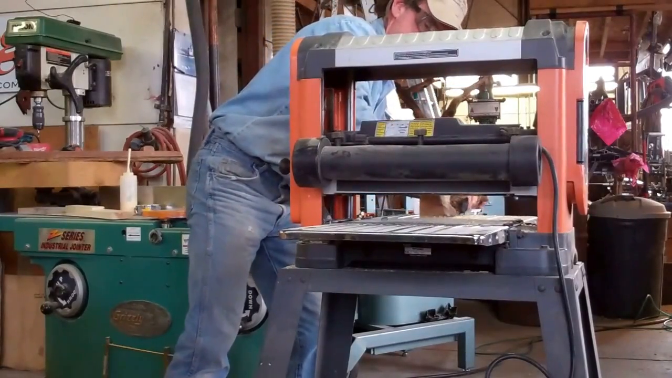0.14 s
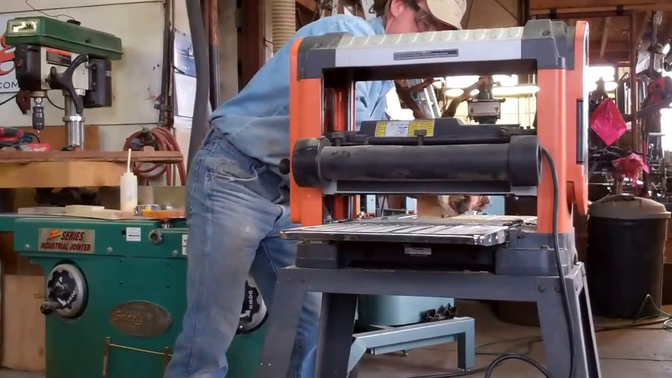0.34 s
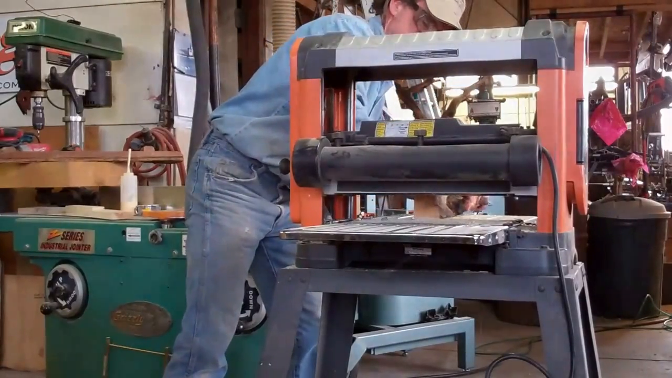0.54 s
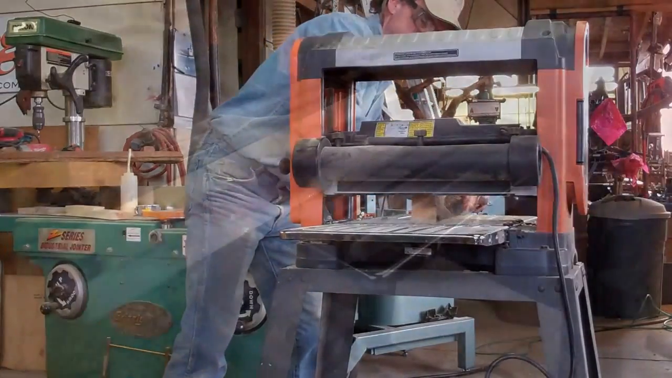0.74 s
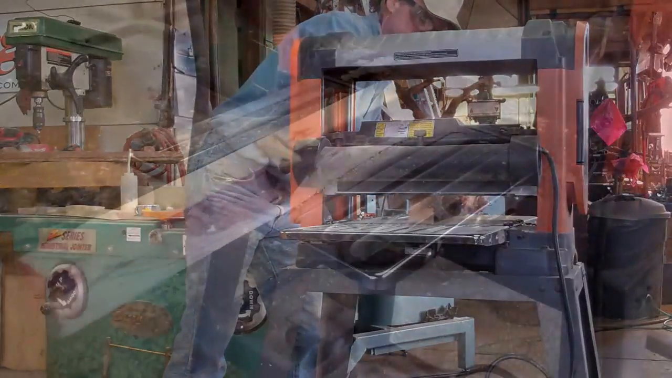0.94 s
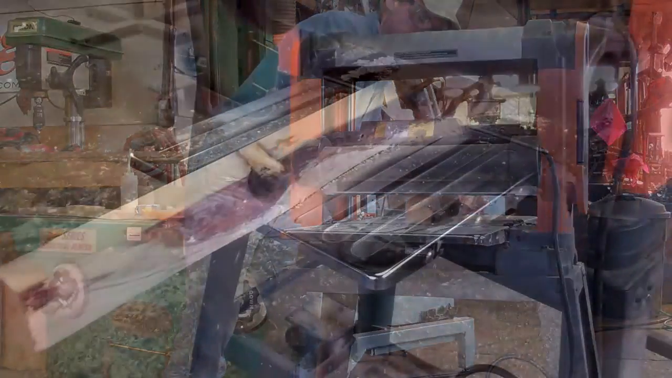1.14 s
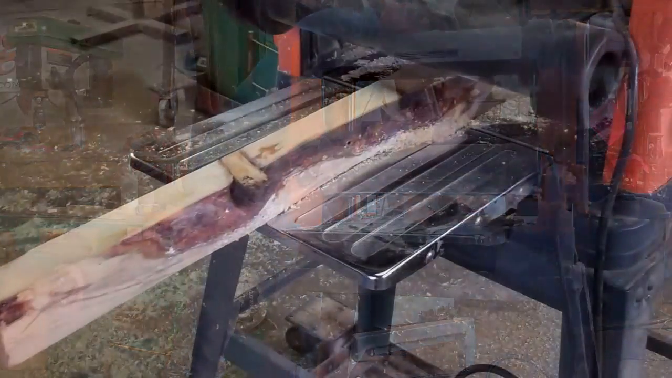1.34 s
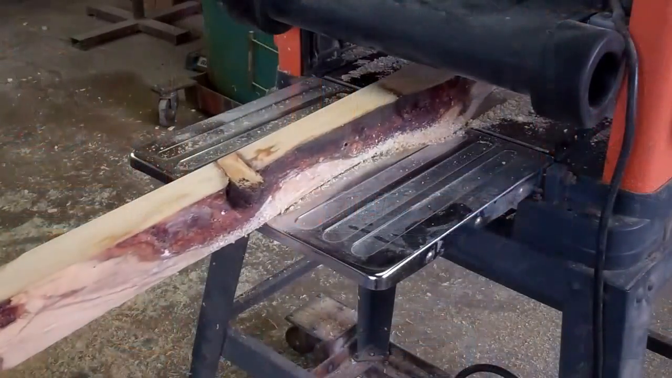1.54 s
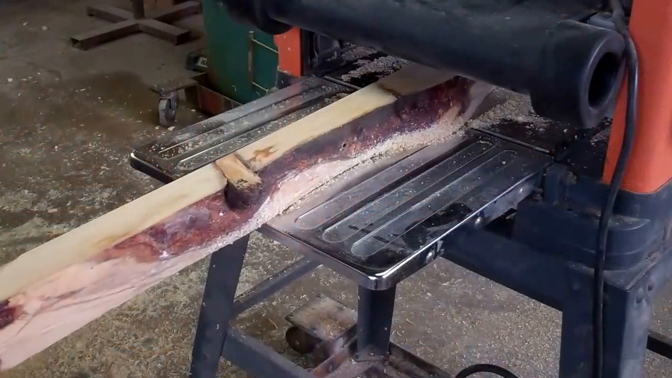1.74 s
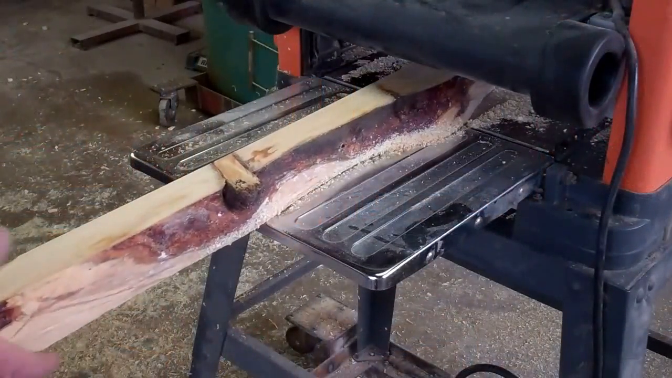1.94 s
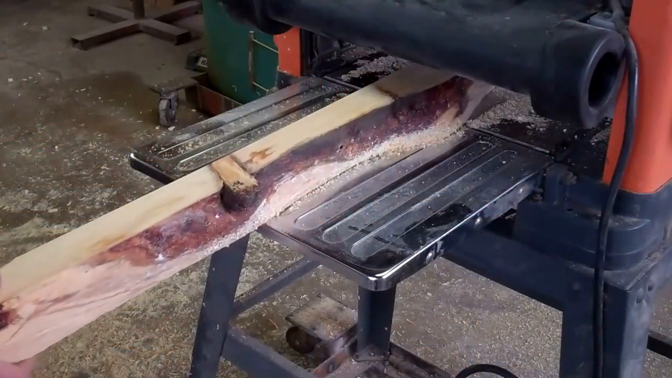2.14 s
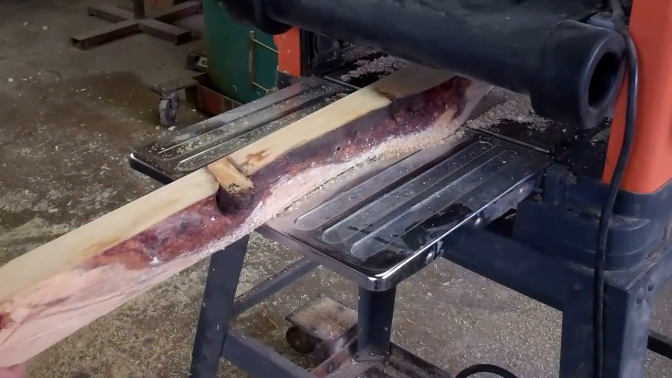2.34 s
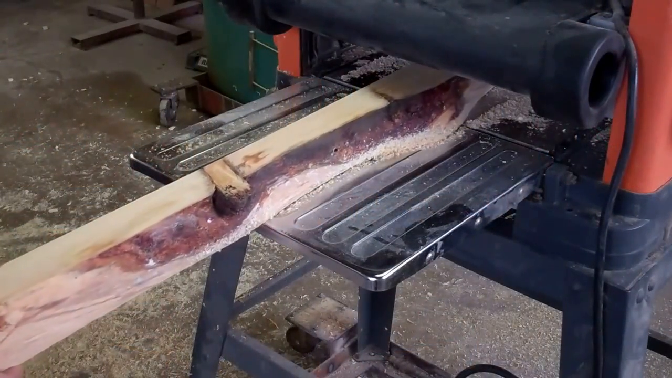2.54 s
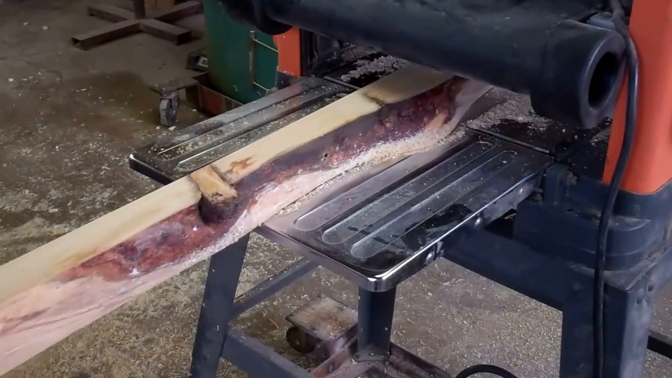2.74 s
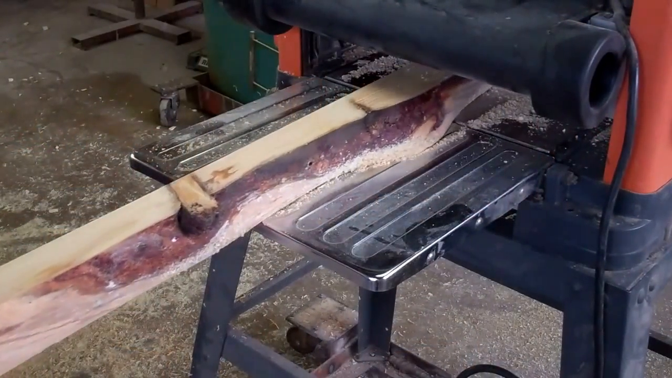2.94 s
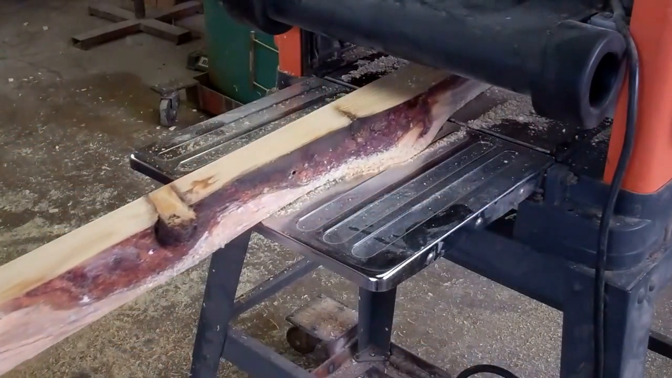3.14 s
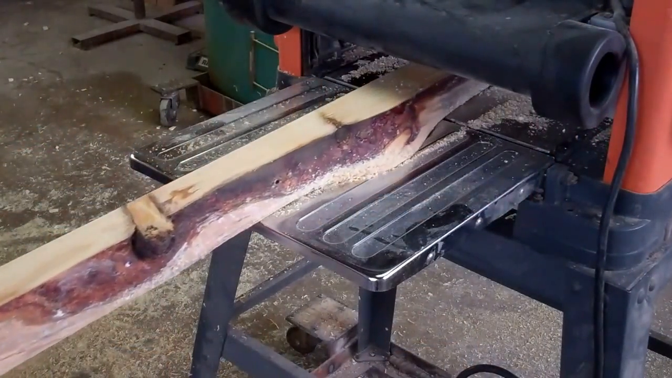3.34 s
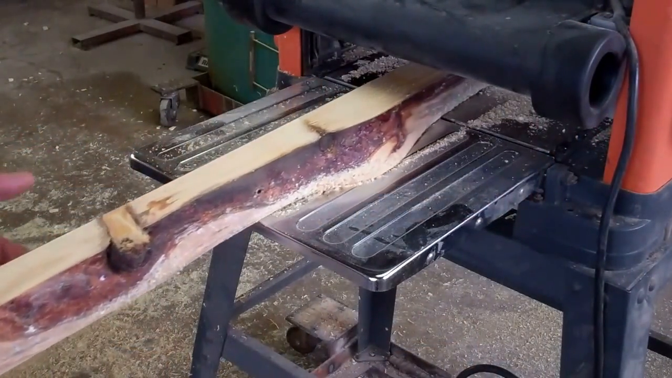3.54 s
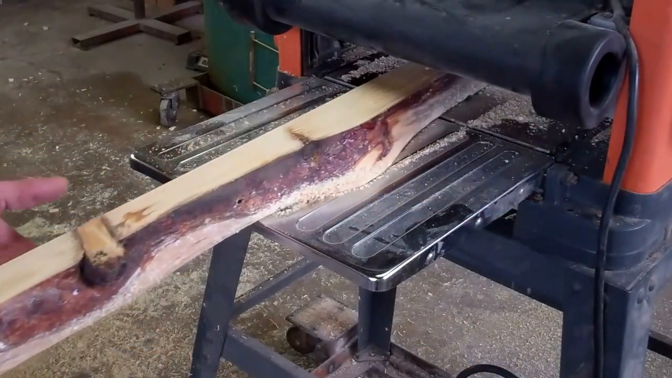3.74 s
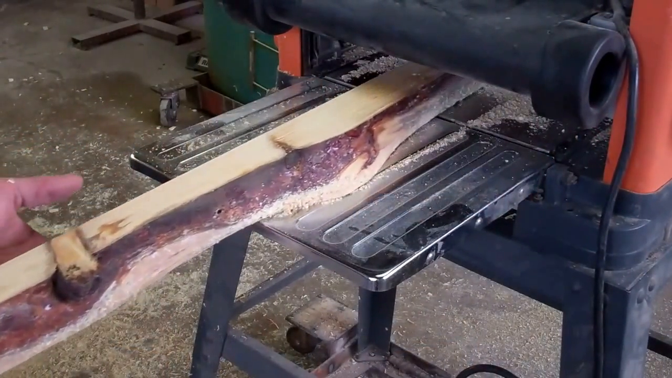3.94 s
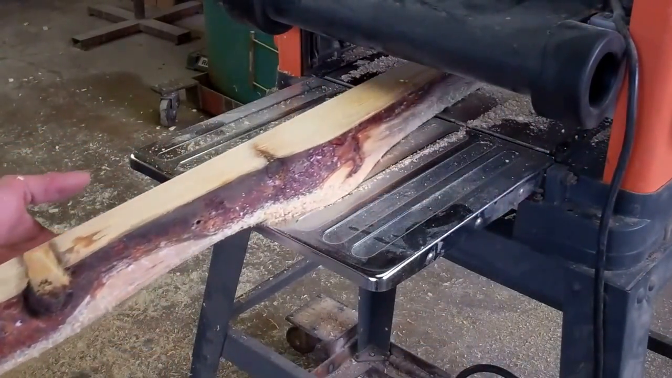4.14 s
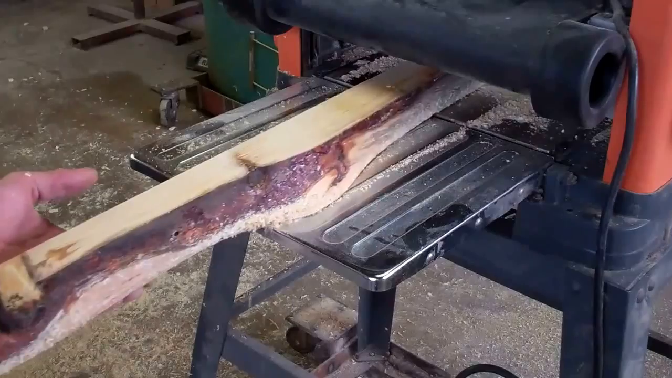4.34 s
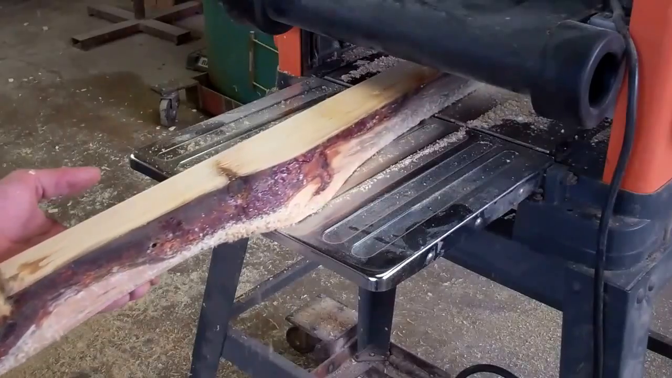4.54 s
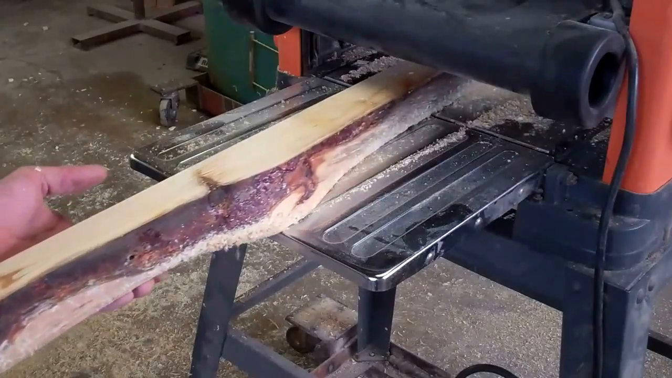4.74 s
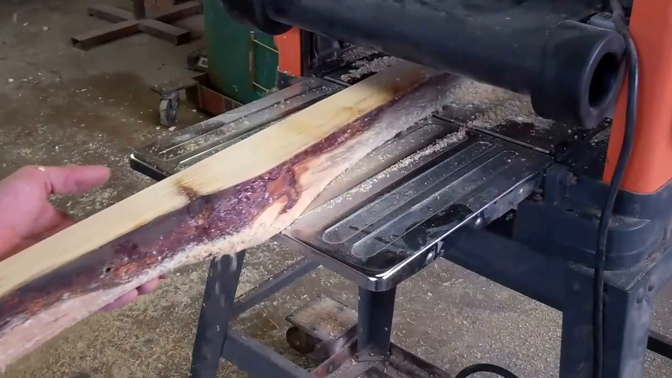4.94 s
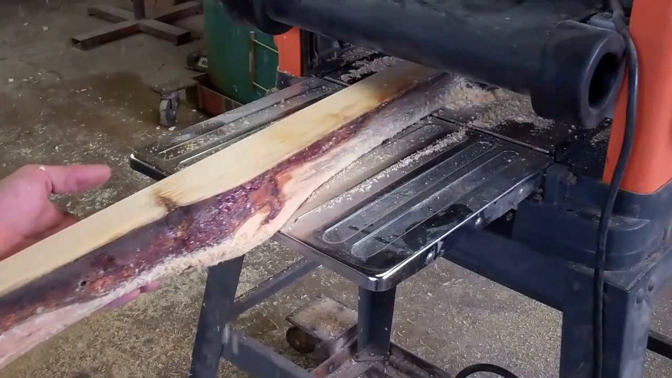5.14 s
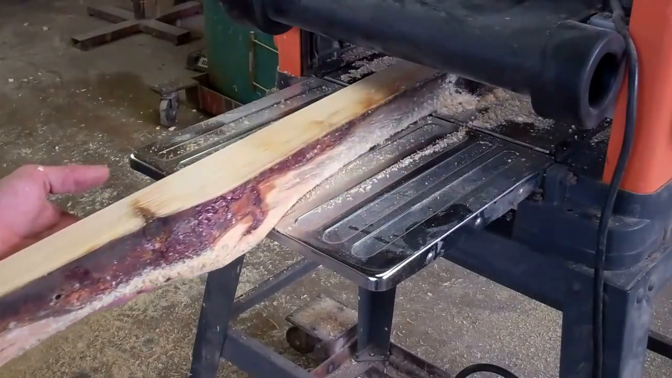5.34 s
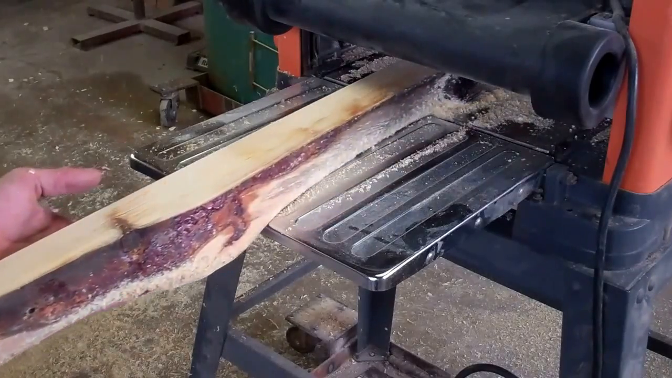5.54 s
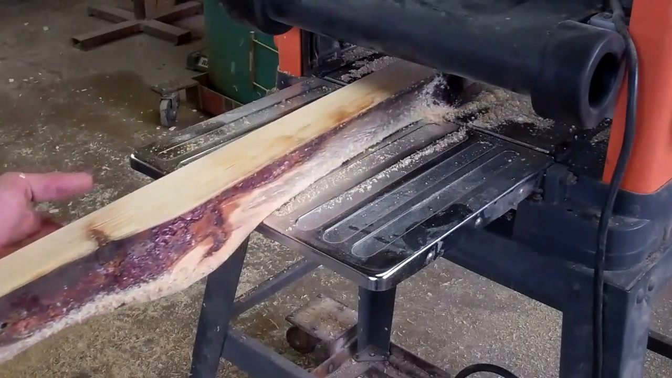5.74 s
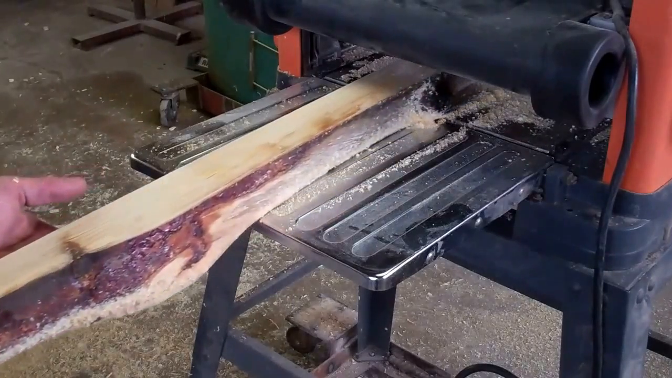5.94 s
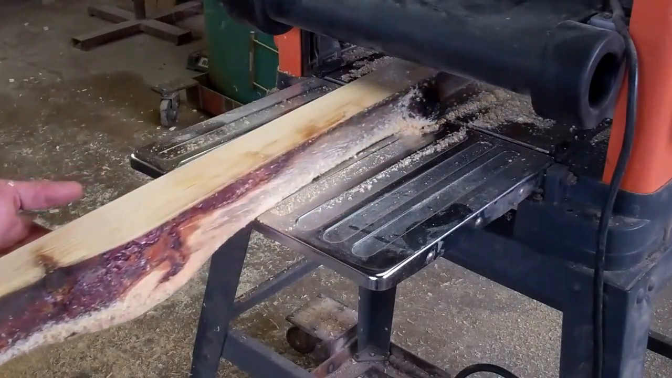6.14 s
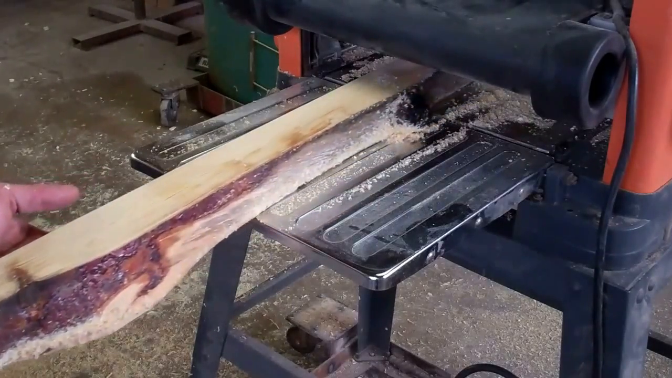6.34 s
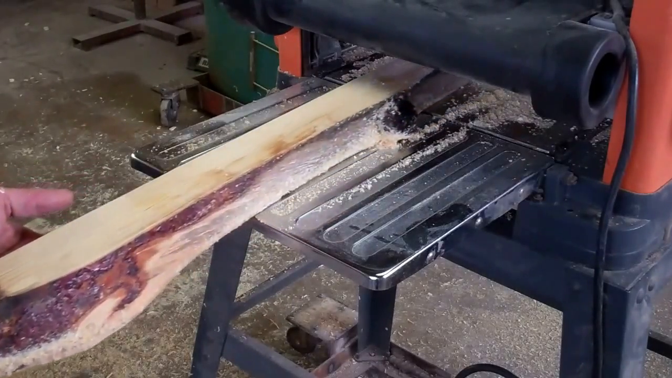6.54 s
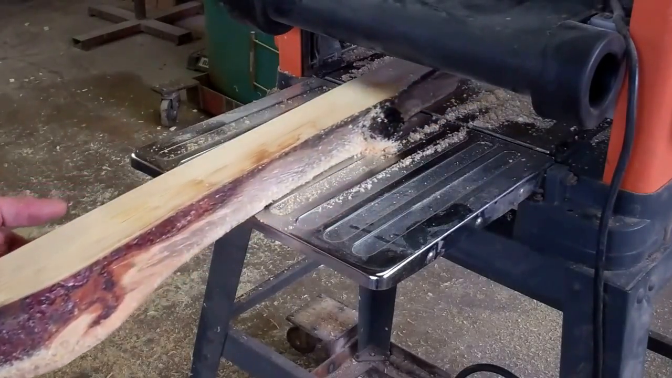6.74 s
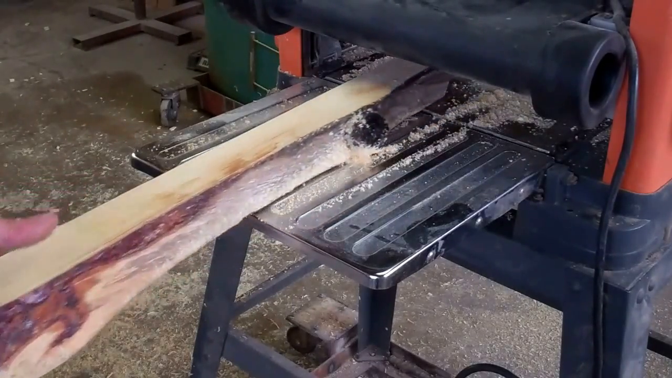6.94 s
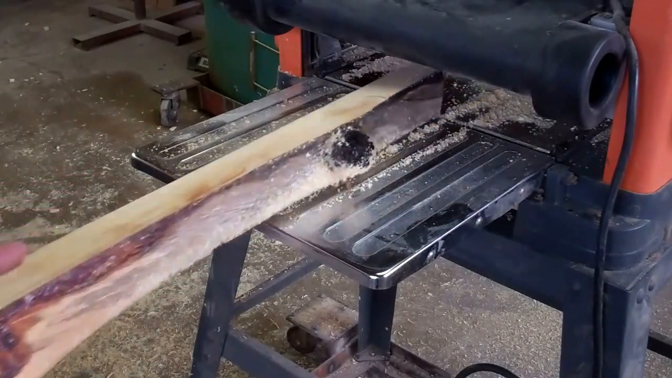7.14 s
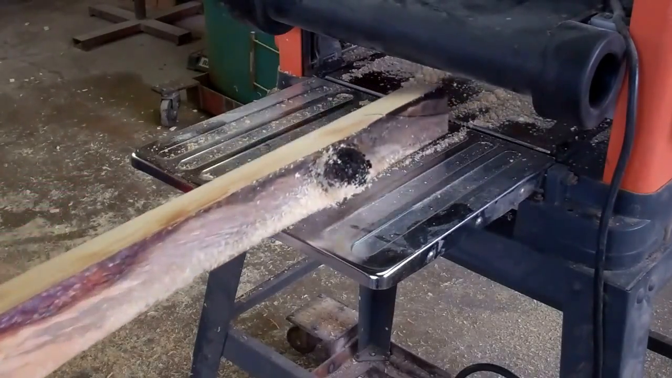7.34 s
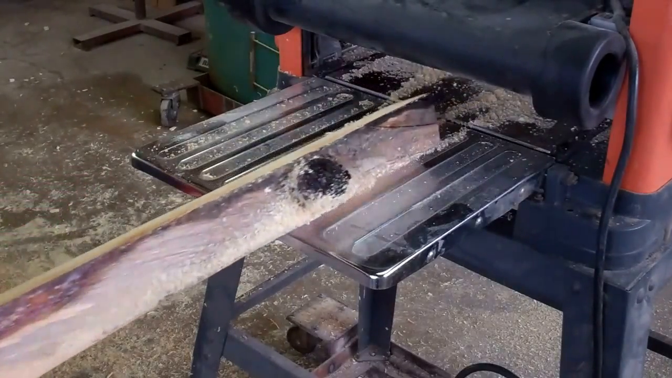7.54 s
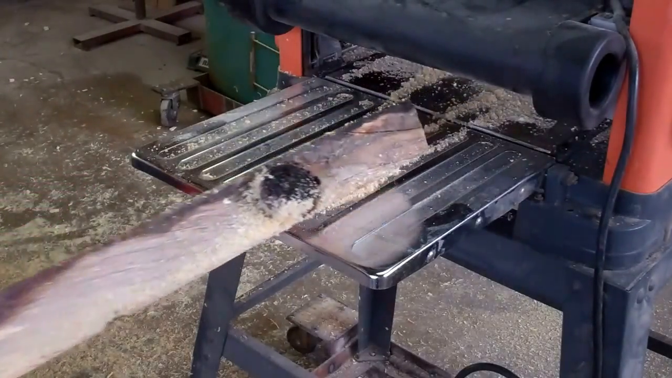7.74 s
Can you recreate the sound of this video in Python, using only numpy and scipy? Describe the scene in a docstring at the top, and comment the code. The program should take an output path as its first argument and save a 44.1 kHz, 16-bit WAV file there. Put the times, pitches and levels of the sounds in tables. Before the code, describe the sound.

Close stereo pickup of a thickness planer, weighted left, with a short room tail. Brief free whine, then knives drag into wood: a loud buzzing howl of changing overtones under a steady spray of chips. It growls and labours before five seconds, splinters crackle at a knot, a last harsh burst ends the cut, and only the rising whine and airy rush remain.

```python
"""A benchtop thickness planer in a small workshop, on a stereo pair, louder on the left.
First it runs free, heard from behind: a whining motor, a fan's rush and the siren of the two-knife cutter head.
A rough slab enters and the knives drag; the view dissolves to the infeed table, near 290 strokes a second.
The slab's resonances lift changing harmonics of the strokes and faint whistles come and go among them.
A knot tears and crackles as random splinters; then the slab leaves and the machine spins up free."""
import sys
import numpy as np
from scipy import signal
from scipy.fft import rfft, irfft
from scipy.io import wavfile
from scipy.ndimage import map_coordinates

SR = 44100
rng = np.random.default_rng(int(sys.argv[2]) if len(sys.argv) > 2 else 0)


def store_pcm(level_fs):
    """Save levels as 16-bit WAV."""
    pcm = np.round(np.clip(level_fs, -1, 1) * 32767).astype(np.int16)
    wavfile.write(sys.argv[1], SR, np.atleast_2d(pcm).T)


N = 343980
STEP = 100  # samples per step of the slow time grid
TIME = np.arange(N) / SR
SLOW_TIME = TIME[::STEP]
SIDES = np.array([[1], [-1]])  # left, right

# All levels in the tables are relative: the viewpoint, the room and the stereo balance scale them further.
# air through the housing: (frequency [Hz], density [dB per Hz])
AIR_SPECTRUM = [(30, -39), (115, -36), (200, -9), (290, -5), (430, -0.5), (530, -5.5), (650, 4), (950, 4),
                (1300, -0.5), (2300, 0.5), (4200, -1), (5600, -4), (7500, -7.5), (14000, -11.5)]
# tones of the motor and its fan: (multiple of the motor speed [ratio], level [dB])
MOTOR_TONES = [(2, -40.5), (4, -52), (6, -32.5), (12, -27.5), (24, -58)]
# tones of the cutter head and its drive: (multiple of the knife rate [ratio], level [dB])
HEAD_TONES = [(1, -30), (1.32, -47), (2, -32), (3, -33)]
# standing waves at the infeed table lift and sink the low tones as the speed slides through them:
# (frequency [Hz], level [dB])
STANDING_WAVES = [(140, -5), (147, 0), (270, 6), (281, 5), (285, 6.5), (289, 5), (292.5, -3), (297, 0.5),
                  (305, 2.5), (314, -4.5), (322, 0.5), (400, 1)]
# what each viewpoint hears: (knives [dB], air rush [dB], motor whine [dB], cutter head siren [dB],
# shaking of the stand [dB])
BEHIND_LEVELS = (-1.5, -22, -8.5, -0.9, -56.5)
INFEED_LEVELS = (-1, -18.5, 1, 1, -46)
# knife strokes a second, from behind and at the infeed table, before the spin-up: (time [s], rate [Hz])
SPEED_BEHIND = [(0, 311.3), (.48, 320), (.85, 311.2), (1.4, 308)]
SPEED_INFEED = [(0.95, 287.9), (1.15, 288.2), (1.39, 287.7), (1.49, 290.6), (2.19, 298.6), (3.18, 292.9),
                (3.98, 294.4), (4.49, 294.1), (4.59, 292.9), (4.85, 285.1), (5.29, 280.4), (5.53, 283.2),
                (5.85, 285.2), (6.35, 290.4), (6.4, 291.8)]
# spray of chips against the hood: (frequency [Hz], density [dB per Hz])
CHIP_SPECTRUM = [(60, -27), (300, -27), (1000, -15), (2000, 5.5), (4000, -5), (6500, 2.5), (10000, 1.5),
                 (14000, -1)]
# showers of chips from the first touch, a rough patch, the knot and the end of the slab:
# (time of the top [s], half length [s], level [dB])
CHIP_SHOWERS = [(0.553, 0.067, -23), (2.95, 0.35, -23), (5.2, 0.11, -19.5), (5.486, 0.13, -11.5),
                (6, 0.11, -19), (6.385, .025, -20)]
# fibres that tear out in rough grain and at the knot:
# (time of the top [s], half length [s], frequency [Hz], width [Hz], level [dB])
TEARS = [(.521, 0.0095, 6700, 900, -22), (0.634, 0.14, 6660, 1000, -31), (4.723, 0.089, 1700, 1209, -26),
         (5.412, 0.05, 8200, 1500, -17.5), (5.455, .004, 2402, 2004, -30), (5.55, 0.13, 3730, 1690, -17.5),
         (5.588, 0.045, 2481, 1480, -19), (6.383, 0.025, 2350, 2603, -21)]
# the slab lifts off the table and bounces once a turn of the cutter head:
# (time of the top [s], half length [s], level [dB])
CHATTER_SWELLS = [(1.647, 0.18, -35), (4.716, 0.19, -29)]
# tones of that bounce: (multiple of the knife rate [ratio], level [dB])
CHATTER_TONES = [(1.5, -2), (2.5, 0), (3.5, -5)]
# how hard the knives bite: (time [s], level [dB])
BITE = [(.5, -35), (1, -30), (1.5, -32.5), (2.5, -32), (3.5, -29), (4.7, -25.5), (4.95, -28.5), (5.4, -29),
        (5.6, -25.5), (6.15, -28.5), (6.4, -22.5)]
# spectrum of a knife stroke: (frequency [Hz], level [dB])
STROKE_SPECTRUM = [(290, -27), (600, -15.5), (1200, 2), (2400, 2), (4000, 0.7), (6000, -5), (9000, -10.5),
                   (13000, -11.5)]
# resonances that swell and fade as the slab moves under the rollers:
# (time of the top [s], half length [s], frequency [Hz], width [Hz], level [dB])
SLAB_RINGS = [(.66, 0.12, 1695, 221, -22.5), (1.02, 0.16, 2060, 200, -22), (1.1, 0.21, 860, 100, -28),
              (1.65, 0.22, 1290, 297, -20), (2.2, 0.41, 563.6, 99, -20), (2.5, .55, 1756, 129, -23),
              (2.52, .2, 2630, 150, -26), (2.73, 0.091, 6680, 340, -23), (3.22, 0.44, 7620, 170, -29),
              (3.25, .14, 9320, 295, -26), (3.41, 0.6, 1500, 130, -23.5), (3.56, 0.16, 5520, 190, -22),
              (3.62, 0.31, 2005, 340, -16.5), (4.43, 0.36, 1140, 180, -21), (4.48, 0.28, 3040, 940, -17.5),
              (4.54, .13, 5340, 240, -22.5), (4.62, 0.09, 1030, 390, -12), (4.75, 0.13, 580, 160, -20),
              (4.835, 0.067, 1563, 370, -8), (4.95, .09, 2400, 360, -16), (4.97, 0.064, 1450, 750, -19),
              (5.6, 0.083, 2160, 420, -13.5), (5.81, 0.14, 1575, 323, -16.5), (5.83, 0.11, 2710, 390, -20),
              (6.09, 0.11, 712, 240, -14.5), (6.18, 0.21, 4230, 900, -21), (6.305, 0.087, 1276, 250, -16),
              (6.31, 0.09, 5270, 1300, -24), (6.32, 0.096, 2440, 480, -12.5)]

DISSOLVE_S = (.65, 1.4)  # from behind to the infeed table
SLAB_ENTERS_S, SLAB_LEAVES_S, SLAB_EDGE_S = .51, 6.415, 0.017
FREE_HZ, SPIN_UP_S = 331.2, .84  # with the slab gone, the knife rate closes in on its free value
LABOURS_BELOW_HZ, SAG_DB_PER_HZ = 290.8, 0.24  # fan and siren weaken below this knife rate
MOTOR_TURNS_PER_STROKE = 1.0583
HUM_HZ = 120  # twice the mains frequency
SPRAY_OVER_BITE_DB = 4  # the steady spray of chips follows the bite
RING_SQUARENESS = 2.84  # 2 is a bell; more holds the top longer and lets go faster
# fainter whistles come and go by chance all through the cut
WHISTLE_RANGE_HZ, WHISTLE_HALF_S, WHISTLE_WIDTH_HZ, WHISTLE_OVER_BITE_DB = (2370, 7500), 0.046, 410, 4.5
LEFT_MINUS_RIGHT_DB = 5
TOP_HZ = 14150  # upper edge of the recorder's band


def undb(db):
    """Decibels to gain."""
    return 10 ** (np.asarray(db) / 20)


def curve(table, t, axis=1):
    """One column of a table of time points, joined by straight lines."""
    rows = np.array(table)
    return np.interp(t, rows[:, 0], rows[:, axis])


def gain_at(spectrum, hz):
    """Gain of a (Hz, dB) spectrum at any frequency."""
    rows = np.array(spectrum)
    return undb(np.interp(np.log(hz + 1), np.log(rows[:, 0]), rows[:, 1]))


def walk(rate):
    """Slow chance with a spread near 1, on the slow time grid; rate in knots a second."""
    knots = rng.standard_normal(4096)
    return map_coordinates(knots, [SLOW_TIME * rate], order=3, mode="wrap")


def fast(slow):
    """From the slow time grid to every sample."""
    return np.interp(TIME, SLOW_TIME, slow)


def swell(t, top_s, half_s, squareness=2):
    """Bell-shaped rise and fall."""
    return np.exp(-.5 * np.abs((t - top_s) / half_s) ** squareness)


def resonance(hz, centre_hz, width_hz):
    """Complex response of a pair of like resonances."""
    return 1 / (1 + 2j * (hz - centre_hz) / width_hz) ** 2


def spread(hz, apart_hz=10000, least=0.044):
    """Side-to-mid ratio between the microphones: little in the bass, large in the treble."""
    return np.minimum(least + hz / apart_hz, 1.15)


def colour(pair, response):
    """Filter two unrelated signals and use them as mid and side."""
    hz = np.arange(N // 2 + 1) * SR / N
    widths = np.array([np.ones(len(hz)), spread(hz)])
    mid, side = irfft(rfft(pair) * response(hz) * widths, N)
    return (mid + SIDES * side) / np.std(mid)


def tones(table, angle, waver, waver_rate):
    """Lines locked to a shaft, wavering in the moving air."""
    out = 0
    for multiple, db in table:
        size = fast(1 + waver * (walk(waver_rate) + 1j * walk(waver_rate)))
        out = out + undb(db) * np.sqrt(2) * (size * np.exp(1j * multiple * angle)).real
    return out


def workshop(x, t60_s=0.37, wet_db=-17):
    """Short diffuse tail of a cluttered room: decaying noise, thin in the bass."""
    t = TIME[:SR // 2]
    tail = rng.standard_normal((2, len(t))) * undb(-60 * t / t60_s) * (t > .006)
    tail = signal.sosfilt(signal.butter(1, 700, "high", fs=SR, output="sos"), tail)
    tail /= np.sqrt(np.sum(tail ** 2, axis=1, keepdims=True))
    return x + undb(wet_db) * signal.fftconvolve(x, tail, axes=1)[:, :N]


def hum():
    """The motor's iron hums at twice the mains frequency."""
    return undb(-58) * np.sqrt(2) * np.sin(2 * np.pi * HUM_HZ * TIME)


def air(angle, chop=0.11):
    """The fan's rush through the housing, chopped lightly by the passing knives."""
    rush = rng.standard_normal((2, N)) * (1 + chop * np.cos(angle))
    return colour(rush, lambda hz: gain_at(AIR_SPECTRUM, hz))


def knife_rate(speed):
    """Strokes a second: the speed table, then an exponential rise towards the free rate."""
    freed = 1 - np.exp(-np.maximum(SLOW_TIME - speed[-1][0], 0) / SPIN_UP_S)
    loaded = curve(speed, SLOW_TIME)
    return loaded + (FREE_HZ - loaded) * freed


def knife_angle(rate, flutter_hz=0.2208):
    """Phase of the knife strokes; the belt makes the speed flutter a little."""
    return 2 * np.pi * np.cumsum(fast(rate + flutter_hz * walk(25))) / SR


def drive(rate, angle, room, whine_db, siren_db, shake_db):
    """Siren of the cutter head and whine of the motor, locked together by the belt."""
    def lift(multiple):
        """Gain of the standing waves at a multiple of the knife rate."""
        return fast(gain_at(room, multiple * rate)) if room else 1

    head = sum(tones([row], angle, waver=0.1, waver_rate=14) * lift(row[0]) for row in HEAD_TONES)
    motor = tones(MOTOR_TONES, angle * MOTOR_TURNS_PER_STROKE, waver=0.29, waver_rate=45)
    # the unbalanced head shakes the stand once a turn, which is two strokes
    shake = np.sqrt(2) * np.cos(angle / 2) * lift(0.497)
    return head * undb(siren_db) + motor * undb(whine_db) + shake * undb(shake_db)


def in_wood():
    """1 while the slab is under the cutter head, 0 before and after, with short ramps."""
    inside_s = np.minimum(TIME - SLAB_ENTERS_S, SLAB_LEAVES_S - TIME)
    return np.clip(inside_s / SLAB_EDGE_S + .5, 0, 1)


def splinters(angle, grain_db, gate, stroke_db):
    """Dense tiny cracks of uneven size, in a burst at every knife stroke."""
    stroke = np.clip(angle / (2 * np.pi), 0, 4095).astype(int)
    stroke_gain = undb(stroke_db * rng.standard_normal(4096)[stroke])
    bursts = np.exp(gate * np.cos(angle)) * stroke_gain
    grains = undb(grain_db * np.minimum(rng.exponential(size=N), 5))
    sizes = np.repeat(grains, 12)[:N]  # each size lasts 12 samples
    return rng.standard_normal((2, N)) * sizes * bursts


def chips(angle):
    """Shavings break off and spray against the hood."""
    cracks = splinters(angle, grain_db=1.9, gate=.5, stroke_db=1)
    steady = undb(curve(BITE, TIME) + SPRAY_OVER_BITE_DB)
    shower_power = sum((undb(db) * swell(TIME, s, half)) ** 2 for s, half, db in CHIP_SHOWERS)
    spray = np.sqrt(steady ** 2 + shower_power)
    return colour(cracks, lambda hz: gain_at(CHIP_SPECTRUM, hz)) * spray * in_wood()


def tear_out(angle):
    """Coarser cracks ring the wood where the grain rips."""
    cracks = splinters(angle, grain_db=3.8, gate=.9, stroke_db=2.5)
    out = 0
    for s, half, centre, width, db in TEARS:
        ringing = colour(cracks, lambda hz: resonance(hz, centre, width))
        out = out + ringing * undb(db) * swell(TIME, s, half)
    return out


def chatter(angle):
    """The bouncing slab growls between the knife harmonics."""
    bounce = sum(undb(db) * swell(TIME, s, half) for s, half, db in CHATTER_SWELLS)
    return bounce * tones(CHATTER_TONES, angle, waver=.25, waver_rate=20)


def whistles(count=16):
    """Faint high resonances of the slab, one in each stretch of the cut, at chance pitches."""
    when, pitch = rng.random((count, 2)).T
    times = SLAB_ENTERS_S + (SLAB_LEAVES_S - SLAB_ENTERS_S) * (np.arange(count) + when) / count
    low, high = WHISTLE_RANGE_HZ
    pitches = low * (high / low) ** pitch
    return [(s, WHISTLE_HALF_S, hz, WHISTLE_WIDTH_HZ, curve(BITE, s) + WHISTLE_OVER_BITE_DB)
            for s, hz in zip(times, pitches)]


def knives(rate, angle, slab_rings, bite_db, patchy_db=5, turning=0.55, shiver=0.17, uneven=0.079, count=46):
    """Each stroke kicks the slab: a stack of harmonics, lifted by whichever resonances are in tune."""
    bite = undb(curve(BITE, SLOW_TIME) + bite_db)
    swells = [undb(db) * swell(SLOW_TIME, s, half, RING_SQUARENESS) for s, half, _, _, db in slab_rings]
    turn, partial, mid, side = np.exp(1j * angle), 1, 0, 0
    for k in range(1, count + 1):
        hz = k * rate
        partial = partial * turn
        rings = [size * resonance(hz, centre, width)
                 for size, (_, _, centre, width, _) in zip(swells, slab_rings)]
        # the many weak modes of the slab shift as it feeds, so each harmonic drifts in level and phase
        drift = walk(3.993)
        # troughs between the modes go deeper than the crests rise
        patches = undb(patchy_db * (np.minimum(drift, drift / 2) - 0.52))
        body = bite * gain_at(STROKE_SPECTRUM, hz) * patches
        size = np.sqrt(body ** 2 + sum(np.abs(ring) ** 2 for ring in rings))
        response = sum(rings) + body * np.exp(2j * np.pi * rng.random())
        lag = np.angle(response) + turning * walk(2.977)
        voice = size * np.exp(1j * lag) * (1 + shiver * (walk(60) + 1j * walk(60)))
        side_lag = 2 * np.pi * rng.random() + walk(2.996)
        across = voice * spread(hz) * np.exp(1j * side_lag)
        mid = mid + (fast(voice) * partial).real
        side = side + (fast(across) * partial).real
    # one of the two knives stands slightly proud
    proud = 1 + uneven * np.cos(angle / 2)
    return np.sqrt(2) * (mid + SIDES * side) * proud * in_wood()


def planer(rate, angle, slab_rings, levels, room=None, cut_db=0.54):
    """The machine from one viewpoint: the knives in the wood, the fan and the drive."""
    bite_db, air_db, whine_db, siren_db, shake_db = levels
    sag_db = fast(SAG_DB_PER_HZ * np.maximum(LABOURS_BELOW_HZ - rate, 0))
    cut = undb(cut_db) * knives(rate, angle, slab_rings, bite_db)
    rush = undb(air_db - sag_db) * air(angle)
    return cut + rush + drive(rate, angle, room, whine_db, siren_db - sag_db, shake_db)


def scene():
    """The view from behind dissolves into the one at the infeed; the sound is louder on the left."""
    near = np.interp(TIME, DISSOLVE_S, (0, 1))
    rate_behind, rate_infeed = knife_rate(SPEED_BEHIND), knife_rate(SPEED_INFEED)
    angle_behind, angle_infeed = knife_angle(rate_behind), knife_angle(rate_infeed)
    angle = np.where(near < .5, angle_behind, angle_infeed)
    # from behind, the first touch is the only slab resonance heard
    first_touch, *later = SLAB_RINGS
    behind = planer(rate_behind, angle_behind, [first_touch], BEHIND_LEVELS)
    infeed = planer(rate_infeed, angle_infeed, later + whistles(), INFEED_LEVELS, STANDING_WAVES)
    machine = (1 - near) * behind + near * infeed
    wood = chatter(angle) + chips(angle) + tear_out(angle)
    balance = undb(SIDES * LEFT_MINUS_RIGHT_DB / 2)
    return workshop(machine + hum() + wood) * balance / balance.mean()


def record(dry, ceiling=0.92):
    """The recorder rounds the highest peaks and cuts the top."""
    rounded = dry / (1 + (dry / ceiling) ** 6) ** (1 / 6)
    return signal.sosfilt(signal.ellip(12, .1, 80, TOP_HZ, fs=SR, output="sos"), rounded)


dry = scene()
out = record(dry)
store_pcm(out)
```